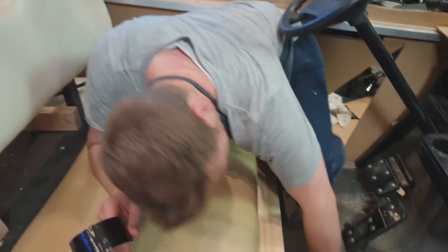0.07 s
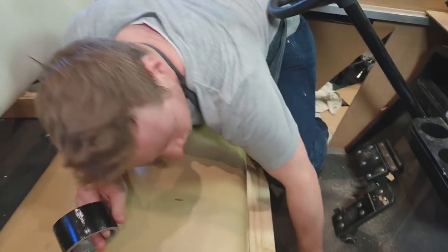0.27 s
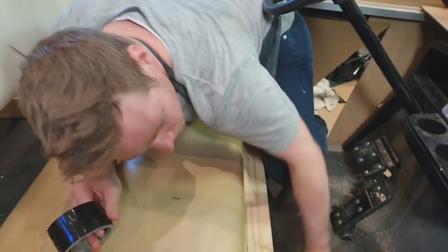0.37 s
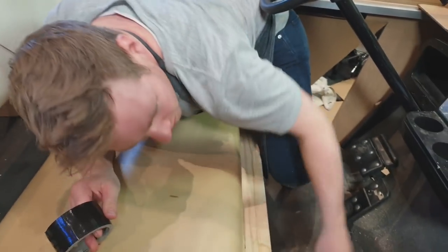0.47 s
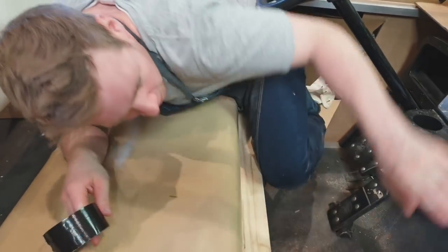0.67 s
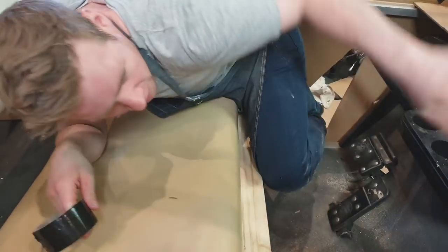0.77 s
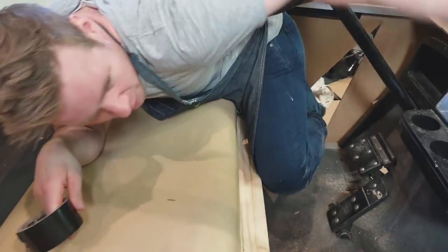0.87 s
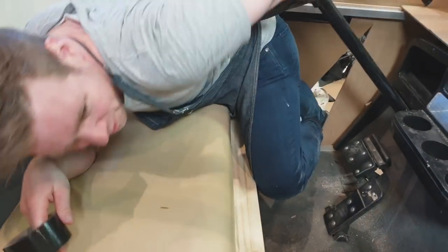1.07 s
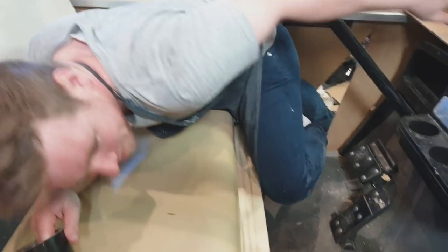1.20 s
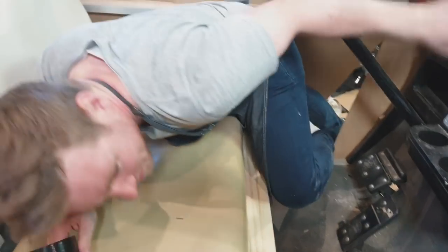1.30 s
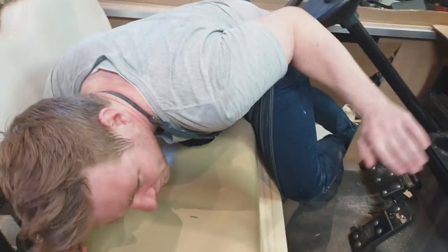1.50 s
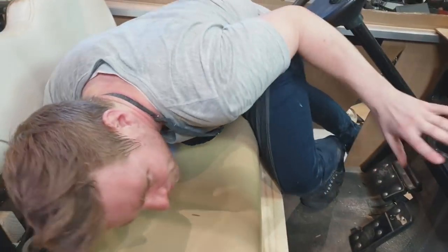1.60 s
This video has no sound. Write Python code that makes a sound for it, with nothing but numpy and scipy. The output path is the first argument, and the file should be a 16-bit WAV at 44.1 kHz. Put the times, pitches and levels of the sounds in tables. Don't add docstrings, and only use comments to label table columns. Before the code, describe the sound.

Close stereo microphone in a small garage: loud boxy wooden thuds and panel knocks tumble together first, softer bumps with ringing fittings follow, then fabric drags hissing and squeaking across board, ending in light knocks.

```python
import sys
import numpy as np
from scipy import signal
from scipy.fft import rfft, irfft
from scipy.io import wavfile
from scipy.ndimage import uniform_filter1d

SR = 44100
rng = np.random.default_rng(int(sys.argv[2]) if len(sys.argv) > 2 else 0)


def convert_level_to_amplitude(level_db):
    exponent = np.asarray(level_db, float) / 20
    return 10 ** exponent


def output_pcm(signal):
    pcm = np.clip(np.atleast_2d(signal).T, -1, 1) * 32767
    wavfile.write(sys.argv[1], SR, np.round(pcm).astype(np.int16))


N = 72765
T = np.arange(N) / SR


def evened(x):
    return x / np.sqrt(np.mean(x ** 2) + 1e-20)


def read(points, hz):
    f, value = np.transpose(points)
    return np.interp(np.log(hz + 1), np.log(f + 1), value)


def add(mix, start_s, sound):
    part = mix[..., round(start_s * SR):][..., :sound.shape[-1]]
    part += sound[..., :part.shape[-1]]


def colour(x, points):
    hz = np.fft.rfftfreq(x.shape[-1], 1 / SR)
    inside = (hz > points[0][0] * 0.7) & (hz < points[-1][0] * 1.02)
    gain = convert_level_to_amplitude(read(points, hz)) * inside
    return evened(irfft(rfft(x) * gain, x.shape[-1]))


def ring(x, peaks, wider):
    out = np.zeros(len(x))
    for hz, width_hz, db in peaks:
        r = np.exp(-np.pi * width_hz * wider / SR)
        poles = [1, -2 * r * np.cos(2 * np.pi * hz / SR), r * r]
        out += convert_level_to_amplitude(db) * signal.lfilter([1 - r, 0, r - 1], poles, x)
    return evened(out)


def slips(per_s, spread_db):
    size = convert_level_to_amplitude(spread_db * np.minimum(rng.exponential(1, N), 4)) * rng.standard_normal(N)
    return evened(size * (rng.random(N) < per_s / SR))


def patchy(x, patch_db):
    z = signal.stft(x, nperseg=512, noverlap=384)[2]
    patches = uniform_filter1d(rng.standard_normal(z.shape[1:]), size=3, axis=0)
    patches = uniform_filter1d(patches, size=10, axis=1)
    z = z * convert_level_to_amplitude(patch_db * evened(patches))
    return evened(signal.istft(z, nperseg=512, noverlap=384)[1][:, :N])


def pan(left_right_db):
    return convert_level_to_amplitude(np.array([left_right_db / 2, -left_right_db / 2]))


def ports(a, b):
    # hz, likeness
    likeness = [(60, 1), (180, 1), (550, 0.93), (1650, 0.74), (4970, 0.14), (15000, 0.085)]
    same = np.clip(read(likeness, np.fft.rfftfreq(N, 1 / SR)), -1, 1)
    second = same * rfft(a) + np.sqrt(1 - same ** 2) * rfft(b)
    return np.array([a, irfft(second, N)])


def housing(x):
    # hz, left_right_db
    lean = [(700, 0), (1200, 0), (2500, -5.5), (9000, 6)]
    return irfft(rfft(x) * pan(read(lean, np.fft.rfftfreq(N, 1 / SR))), N)


def garage(x):
    # hz, t60_s
    decay = [(100, 0.15), (500, 0.26), (2000, 0.3), (8000, 0.066)]
    wet_db = -4
    taps = np.zeros((2, 20000))
    at = np.arange(200, 19980, 20) + rng.integers(0, 20, (2, 989))
    np.put_along_axis(taps, at, rng.choice([-1., 1.], at.shape), 1)
    hz, t, z = signal.stft(taps, SR, nperseg=256)
    z = z * convert_level_to_amplitude(-60 * t / read(decay, hz)[:, None])
    tail = signal.istft(z, SR, nperseg=256)[1]
    tail *= convert_level_to_amplitude(wet_db) / np.linalg.norm(tail[0])
    tail[0, 0] += 1
    tail[1, 12] += 1
    return signal.fftconvolve(x, tail, axes=1)[:, :N]


def air():
    # hz, level_db_per_hz
    air_spectrum = [(18, -40), (30, -36), (79, -9.5), (250, -9), (1440, -32.5), (4930, -21.5), (7300, -24),
                    (10500, -21), (15600, -17.5)]
    noise = patchy(rng.standard_normal((2, N)), 1.8)
    return convert_level_to_amplitude(-48.5) * ports(*colour(noise, air_spectrum))


def scuff():
    # start_s, length_s, scuff_db, brightness_db, left_right_db
    strokes = [(0, 0.041, -50.5, -2, -8.5), (0.01, 0.16, -50.5, 2, -10), (0.111, 0.087, -43.5, -5, -13),
               (0.124, 0.057, -52, 9.5, -3), (0.132, 0.19, -40, -5, -9), (.205, 0.055, -54, 1, -7),
               (0.339, 0.21, -58.5, 0, -18), (0.641, 0.17, -55, 4.5, -13), (0.74, 0.35, -50, 0, -10.5),
               (0.871, 0.052, -53, 10.5, -2), (0.921, 0.027, -51.5, 4, -7),
               (1.027, 0.17, -47.5, -3.5, -5.5), (1.102, 0.16, -40, -3, -4.5), (1.206, 0.29, -39, 0, -4.5),
               (1.426, 0.34, -55, 4.5, -10), (1.539, 0.022, -44, -11, -9), (1.547, 0.22, -49.5, 3, -2.5)]
    # hz, level_db
    weave = [(900, -15.5), (1500, -9), (2000, -7), (2500, -2.5), (3000, -5), (4000, -6), (6300, -8.5),
             (7200, -17)]
    weave_top = [(7000, -9.5), (9300, -6.5), (11500, -5), (15600, -7.5)]
    # time_s, ridge_hz, level_db
    squeak_path = [
        (1.09, 2800, 0),
        (1.137, 2800, 3),
        (1.2, 2550, -13),
        (1.265, 2620, 8),
        (1.309, 2430, -5),
        (1.326, 2450, 10),
        (1.349, 2460, -1),
        (1.38, 2600, 1),
        (1.43, 2550, -3),
    ]
    rise_s, rise_share, edge_db = 0.0053, 0.3, -18
    squeak_hz, squeak_width_hz, squeak_db = 2412, 94, -9

    low, top = np.zeros((2, 2, N))
    for start_s, length_s, db, bright_db, pan_db in strokes:
        peak_s = max(length_s * rise_share * min(length_s / 0.24, 1.5), rise_s)
        t = T[:round(length_s * SR)]
        off_peak = np.interp(t, [0, peak_s, length_s], [1, 0, 1])
        shape = convert_level_to_amplitude(db + edge_db * off_peak ** 2)
        add(low, start_s, shape * pan(pan_db)[:, None])
        add(top, start_s, shape * convert_level_to_amplitude(bright_db) * pan(0.2 * pan_db)[:, None])

    fibres = []
    for _ in "lr":
        clicks = slips(9000, 0.46)
        flutter = evened(uniform_filter1d(rng.standard_normal(N), 400))
        fibres.append(clicks * convert_level_to_amplitude(0.82 * flutter))
    fibres = np.array(fibres)

    at_s, ridge_hz, ridge_db = np.transpose(squeak_path)
    shift_hz = np.interp(T, at_s, ridge_hz) - squeak_hz
    turn = np.exp(2j * np.pi * np.cumsum(shift_hz) / SR)
    tones = [ring(v, [(squeak_hz, squeak_width_hz, 0)], 0.6) for v in fibres]
    squeak = np.array([(signal.hilbert(tone) * turn).real for tone in tones])
    squeak *= convert_level_to_amplitude(squeak_db + np.interp(T, at_s, ridge_db, -60, -60))

    hiss = patchy(fibres, 2.8)
    return low * (colour(hiss, weave) + squeak) + top * colour(hiss, weave_top)


def pings():
    # start_s, peak_db, ring_hz, t60_s
    plates = [(.001, -32.5, 1455, 0.025), (.086, -38, 940, .04), (.095, -30, 1800, 0.1),
              (.098, -29, 509, 0.065), (.124, -25, 598, 0.11), (.146, -17, 1600, 0.041),
              (.172, -23, 730, 0.055), (.183, -23.5, 420, 0.11), (.207, -40, 930, 0.081),
              (.272, -37, 700, 0.038), (.617, -40, 391, 0.11), (.655, -37.5, 310, 0.063),
              (.676, -46, 2670, 0.07), (.726, -38, 1310, 0.019), (.799, -34, 854, 0.046),
              (.885, -24, 550, .05), (.904, -25, 640, 0.042), (.926, -37, 4100, .08),
              (1.048, -32, 803, 0.031), (1.052, -38, 1300, 0.045), (1.064, -35.5, 860, 0.036),
              (1.079, -51, 950, 0.042), (1.333, -44.5, 593, .05), (1.125, -42, 1048, 0.11),
              (1.320, -38, 2460, .12), (1.452, -46, 940, .1), (1.495, -47.5, 1146, .1),
              (1.51, -44, 490, .08), (1.563, -36, 618, 0.048), (1.592, -42, 1293, 0.072),
              (1.57, -46, 5400, .25), (1.62, -41.5, 648, 0.093)]
    rise_s = 0.00092
    out, t = np.zeros(N), T[:6000]
    for start_s, db, hz, t60_s in plates:
        pair = np.sin(2 * np.pi * hz * t) + 0.44 * np.sin(2 * np.pi * hz * 1.06 * t)
        decay = convert_level_to_amplitude(db - 4 - 60 * t / max(t60_s, 0.02))
        add(out, start_s, decay * (1 - np.exp(-t / rise_s)) * pair)
    return out


def knocks():
    # start_s, peak_db, treble_db, crackle_t60_s
    hits = [(.033, -26, -28, 0.097), (.090, -24, -13, 0.17), (0.113, -13.5, -9, 0.15),
            (0.149, -8.5, -20, 0.13), (.169, -10.5, -22, 0.039), (0.187, -18.5, -28, 0.016),
            (.205, -18, -12, 0.098), (.250, -26.5, -23, 0.23), (.335, -28.5, -9, 0.037),
            (.397, -24.5, -17, 0.048), (.591, -27, -10.5, 0.059), (.618, -30, -6.5, 0.029),
            (0.676, -57, 6, 0.03), (.727, -23, -10, 0.02), (0.779, -47, -8, 0.053), (.800, -27, -6, 0.018),
            (.828, -26.5, -16, 0.03), (.853, -23, -21, 0.028), (0.874, -26.5, -23, 0.037),
            (.886, -22, -6.5, 0.031), (0.901, -35, 2, 0.035), (.926, -31, 4.5, 0.053),
            (1.047, -33, -17, 0.036), (1.051, -23, -9, 0.025), (1.543, -33.5, 0.5, 0.017),
            (1.612, -36.5, 5, .05)]
    # hz, width_hz, level_db
    panel = [(416, 45, 11), (560, 17, 11), (574, 90, 4.5), (743, 90, 10.5), (890, 83, 2), (940, 49, 3),
             (970, 230, -7), (1284, 27, 4.5), (1586, 143, 4), (1665, 31, -6.5), (2100, 160, -7),
             (2400, 65, -8)]
    snap, snap_t60_s, tick_t60_s = 1.8, 0.004, 0.02
    panel_top_hz = 3210
    out, t = np.zeros(N), T[:6000]
    tick_band = signal.butter(4, [2300, 6500], "band", fs=SR, output="sos")
    noise = rng.standard_normal((len(hits), 3, 6000))
    for (start_s, db, treble_db, t60_s), (a, b, c) in zip(hits, noise):
        flutter_db = 20 * 0.152 * evened(uniform_filter1d(c, 90))
        crackle = a * convert_level_to_amplitude(flutter_db - 60 * t / t60_s)
        crackle += snap * a * convert_level_to_amplitude(-60 * t / snap_t60_s)
        dulling = signal.butter(3, panel_top_hz * convert_level_to_amplitude(0.093 * db), fs=SR, output="sos")
        body = signal.sosfilt(dulling, ring(crackle, panel, 2.9))
        tick = signal.sosfilt(tick_band, b) * convert_level_to_amplitude(treble_db - 60 * t / tick_t60_s)
        add(out, start_s, convert_level_to_amplitude(db - 1.5) * (body / abs(body).max() + tick))
    return out


def groan():
    # time_s, groan_db, frame_rumble_db
    weight = [(0, -33.5, -53), (0.07, -39, -53), (.15, -25.5, -43), (.22, -29.5, -27.5),
              (.33, -36.5, -37.5), (.45, -42.5, -50), (.56, -60.5, -47.5), (.62, -48.5, -47.5),
              (.79, -45.5, -47.5), (.9, -31.5, -36), (0.961, -39.5, -33.5), (1.03, -40.5, -41),
              (1.1, -42.5, -38.5), (1.25, -55.5, -46.5), (1.5, -55.5, -56), (1.65, -39.5, -44)]
    # hz, width_hz, level_db
    box_modes = [(95.4, 60, -19), (131.5, 32, -1.5), (149.6, 5.5, 1.5), (191, 65, 5), (258, 8.8, -6),
                 (283, 19, -14), (383, 25, -15.5), (560, 105, -4.5)]
    # hz, width_hz, level_db
    frame_modes = [(47, 36.2, 6), (64.8, 8.6, -32)]
    at_s, box_db, frame_db = np.transpose(weight)
    soft_slips = np.convolve(slips(1500, 0.42), np.hanning(70), "same")
    box = ring(soft_slips, box_modes, 1.83)
    frame = ring(ring(slips(900, 0.46), frame_modes, 1.57), frame_modes, 3.74)
    box *= convert_level_to_amplitude(np.interp(T, at_s, box_db) - 1.5)
    frame *= convert_level_to_amplitude(np.interp(T, at_s, frame_db) - 1.0)
    return box + frame


def thumps():
    # start_s, peak_db, ring_hz, t60_s
    blows = [(0, -28.5, 249, 0.043), (0.033, -42, 248, 0.044), (0.085, -23.5, 129, 0.079),
             (0.095, -23.5, 150, 0.065), (0.116, -14.5, 156, 0.12), (.143, -5, 175, 0.067),
             (0.167, -7, 146, 0.066), (.177, -6, 182, 0.035), (0.194, -12.5, 212, 0.065),
             (0.214, -38, 150, 0.032), (.226, -16.5, 198, 0.059), (.254, -17.5, 105.7, 0.11),
             (0.273, -22.5, 113.5, 0.11), (0.305, -25.5, 191.5, 0.11), (.338, -27, 187, 0.064),
             (0.401, -28.5, 191, 0.16), (.589, -24.5, 173.4, 0.048), (.615, -24, 216, 0.045),
             (0.727, -25.5, 149, 0.047), (0.797, -32.5, 281, 0.15), (0.828, -26, 139.9, 0.45),
             (0.863, -33, 138, 0.2), (0.865, -19.5, 263.6, 0.048), (0.898, -17, 281, 0.097),
             (0.914, -18, 142, 0.14), (0.933, -24, 142.7, 0.33), (0.948, -24.5, 169, 0.074),
             (1.046, -25.5, 139, 0.05), (1.054, -29.5, 340, 0.039), (1.063, -27, 131, 0.051),
             (1.094, -34, 102, 0.073), (1.223, -33, 120, 0.095), (1.345, -39.5, 138, 0.11),
             (1.382, -30.5, 197, 0.049), (1.542, -40, 260, 0.14), (1.575, -47.5, 423, 0.15),
             (1.605, -33.5, 242, 0.063), (1.625, -41, 513, 0.06), (1.641, -26, 150, .06)]
    rise_s = 0.0035
    out, t = np.zeros(N), T[:9000]
    for start_s, db, hz, t60_s in blows:
        tone = np.sin(2 * np.pi * hz * t)
        tone += 0.39 * np.sin(2 * np.pi * 2.177 * hz * t) * convert_level_to_amplitude(-300 * t)
        decay = convert_level_to_amplitude(db - 60 * t / max(t60_s, 0.02))
        add(out, start_s, decay * (1 - np.exp(-t / rise_s)) * tone)
    return out


def scene():
    low = thumps() + groan()
    near = garage((knocks() + pings() + convert_level_to_amplitude(-14.5) * low)[None])
    bass = ports(low, 1.53 * np.roll(low, 150))
    return bass + housing(near) + scuff() + air()


def top_cut(x):
    return signal.sosfilt(signal.butter(12, 16750, fs=SR, output="sos"), x)


def record(dry):
    bass_cut = signal.butter(6, 42.6, "high", fs=SR, output="sos")
    band_limit = signal.firwin(1023, 15600, window=("kaiser", 9), fs=SR)
    x = signal.sosfilt(bass_cut, dry)
    x = signal.oaconvolve(x, band_limit[None], "same")
    return top_cut(x)


dry = scene()
out = record(dry)
output_pcm(out)
```